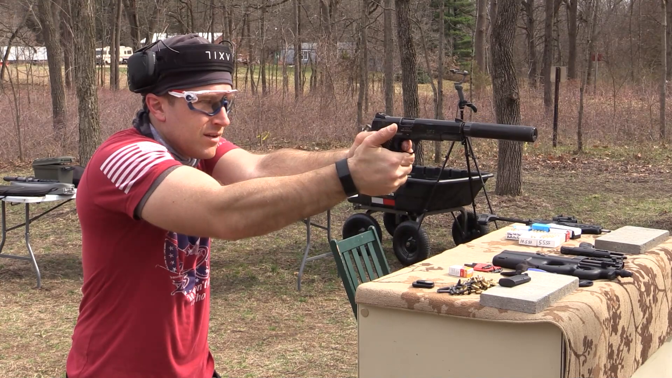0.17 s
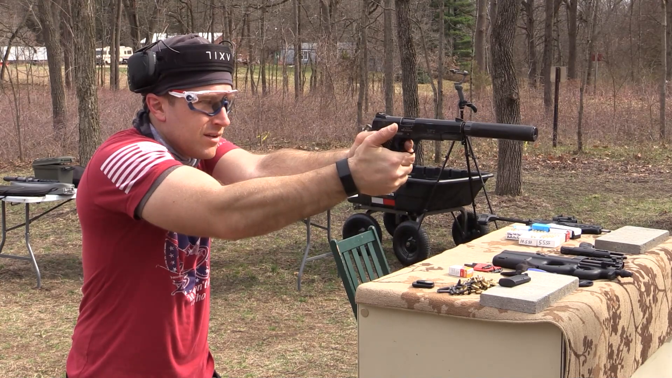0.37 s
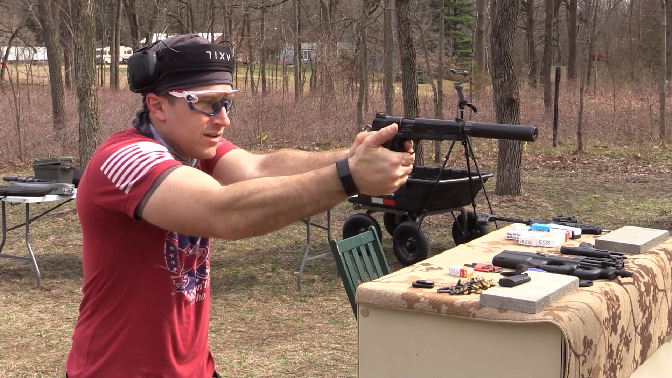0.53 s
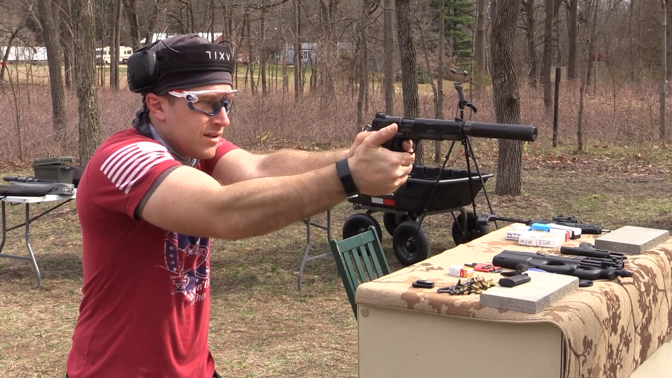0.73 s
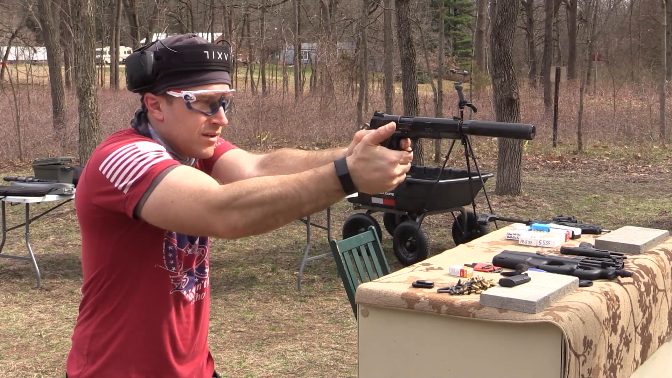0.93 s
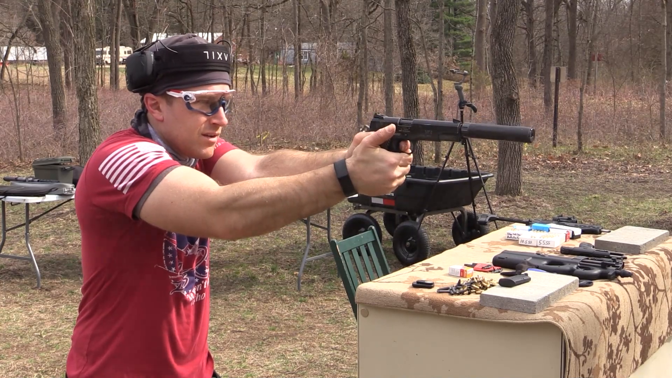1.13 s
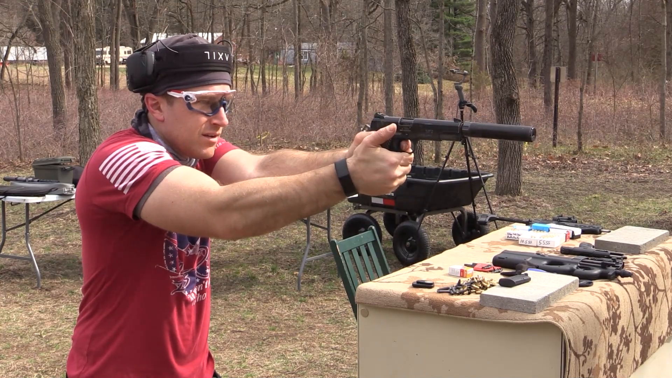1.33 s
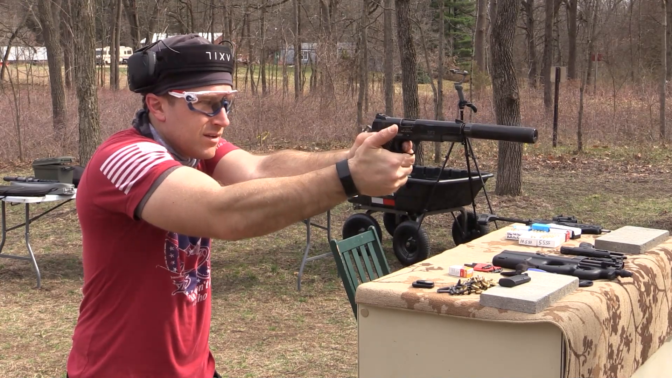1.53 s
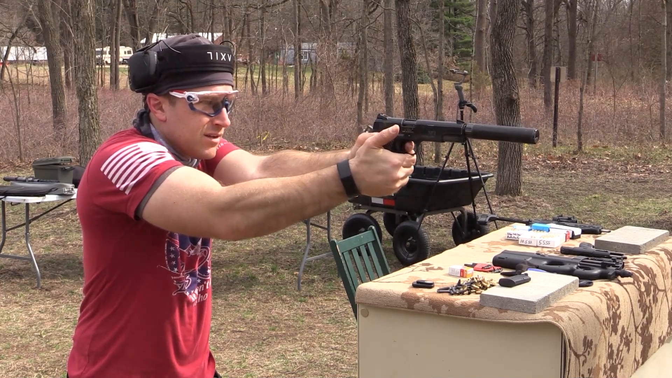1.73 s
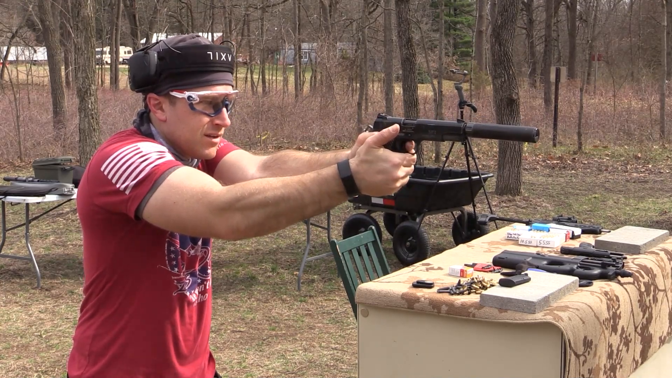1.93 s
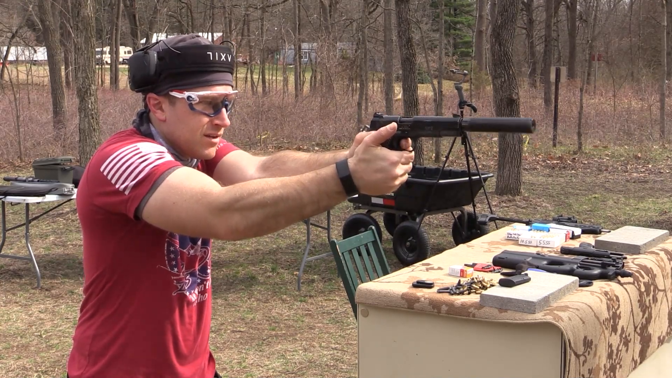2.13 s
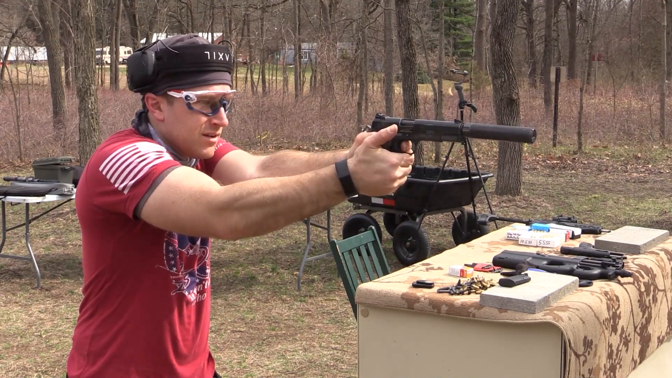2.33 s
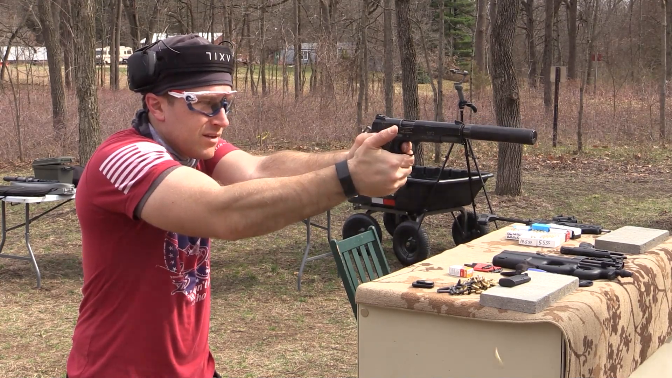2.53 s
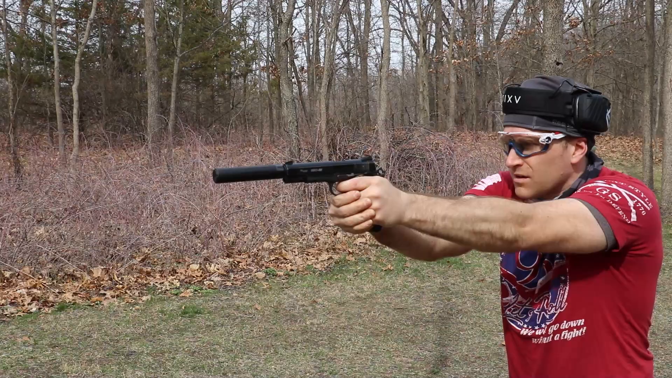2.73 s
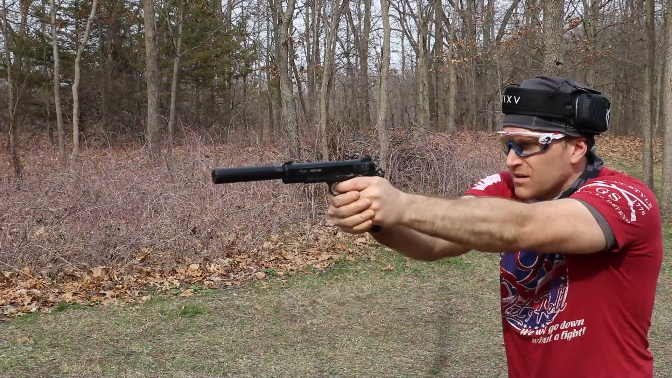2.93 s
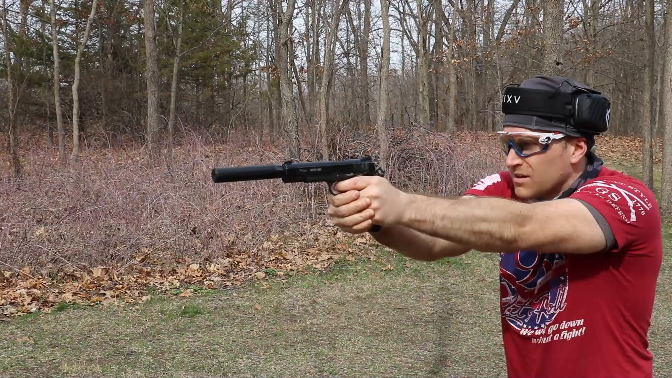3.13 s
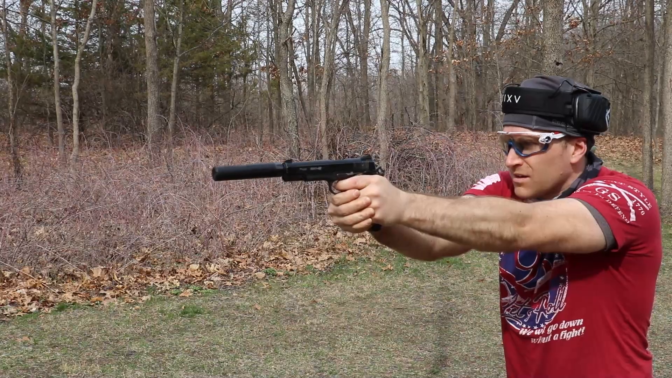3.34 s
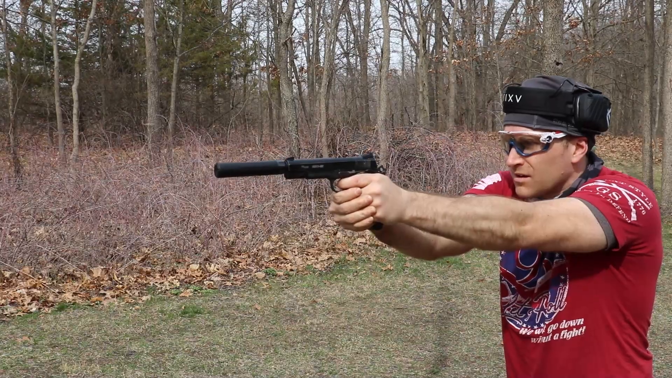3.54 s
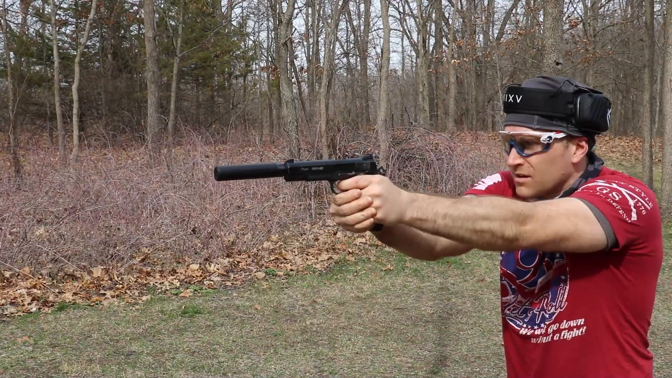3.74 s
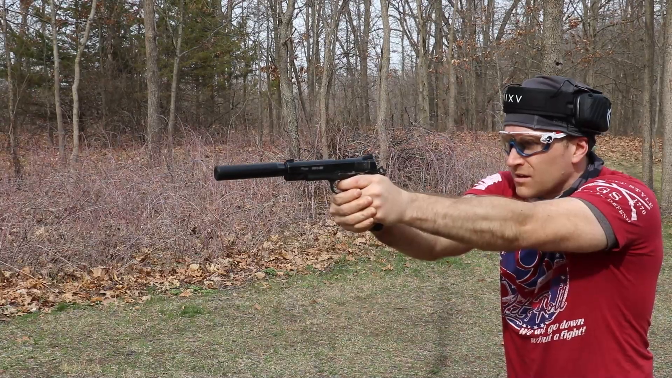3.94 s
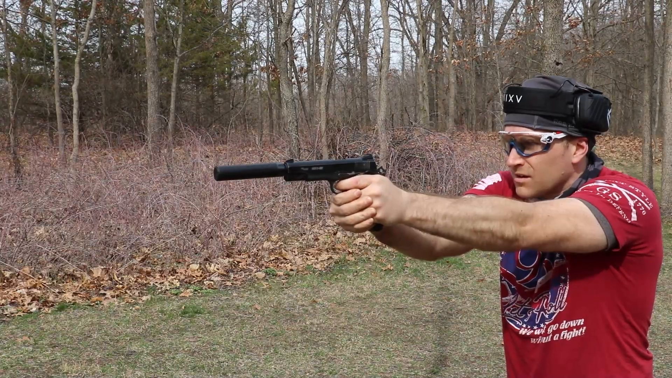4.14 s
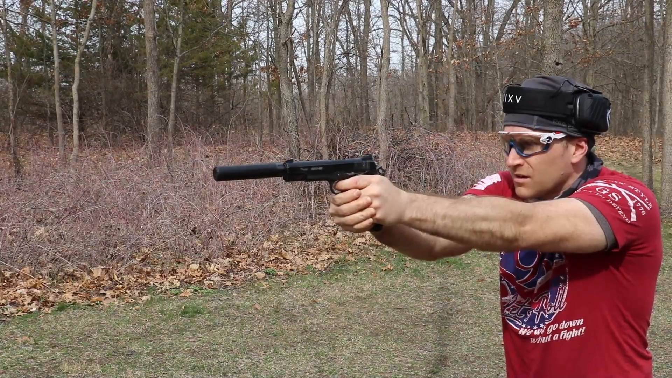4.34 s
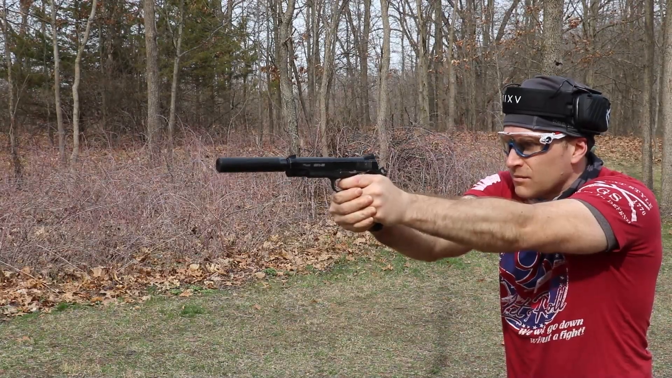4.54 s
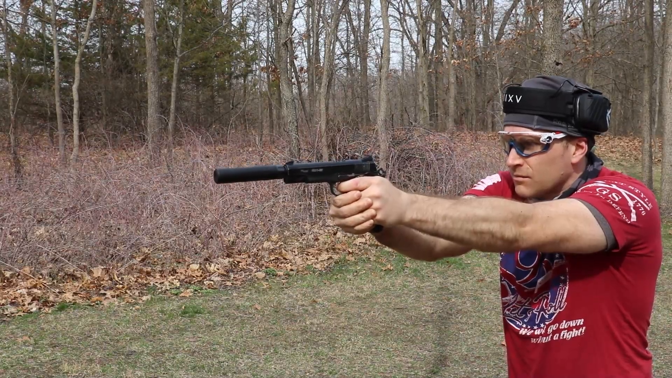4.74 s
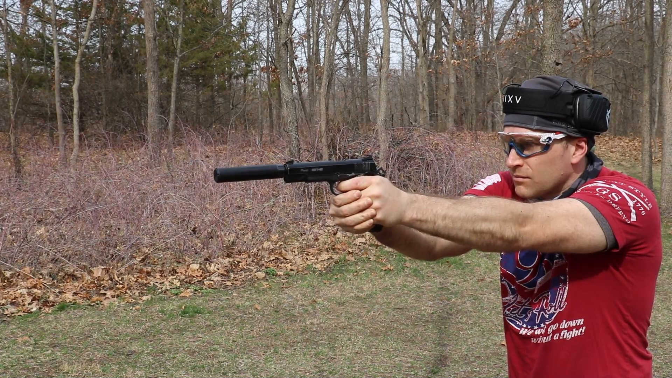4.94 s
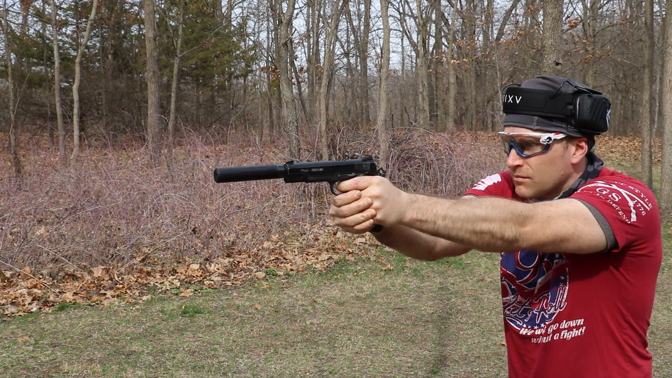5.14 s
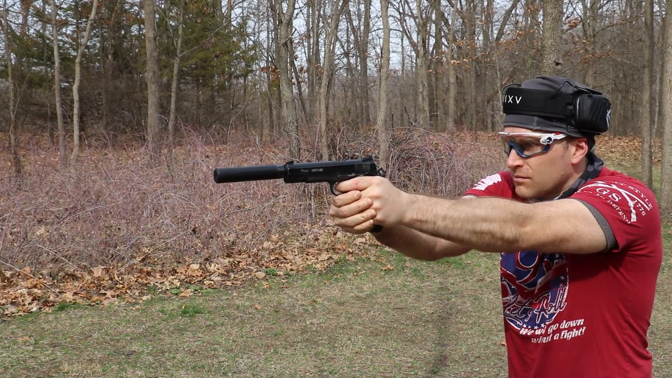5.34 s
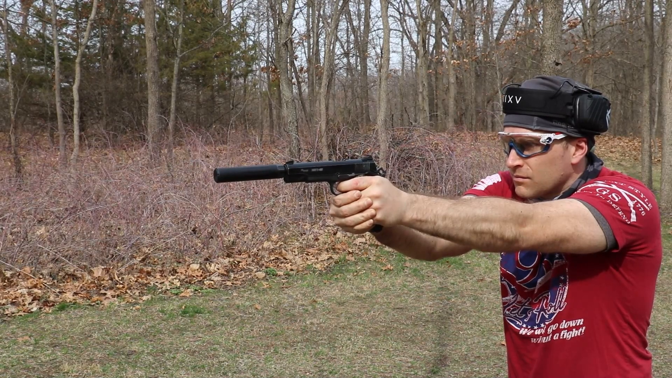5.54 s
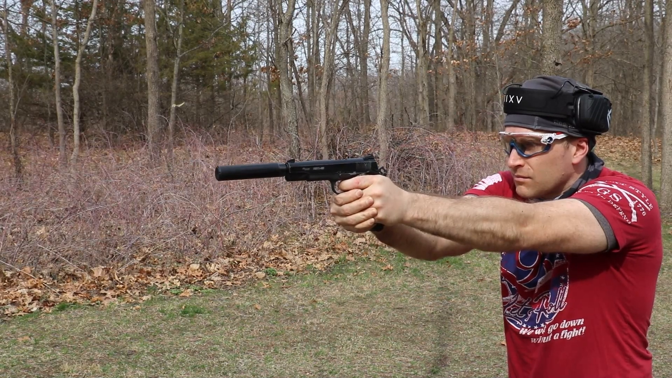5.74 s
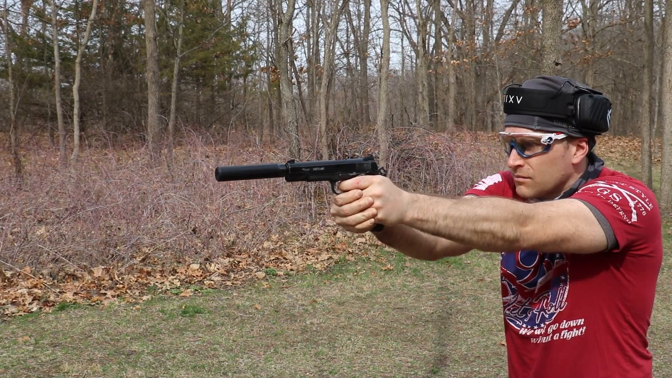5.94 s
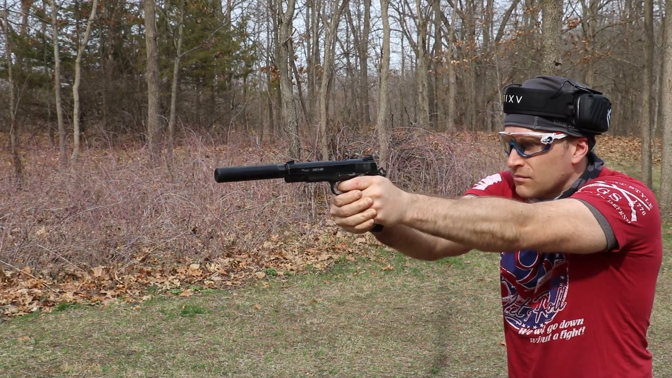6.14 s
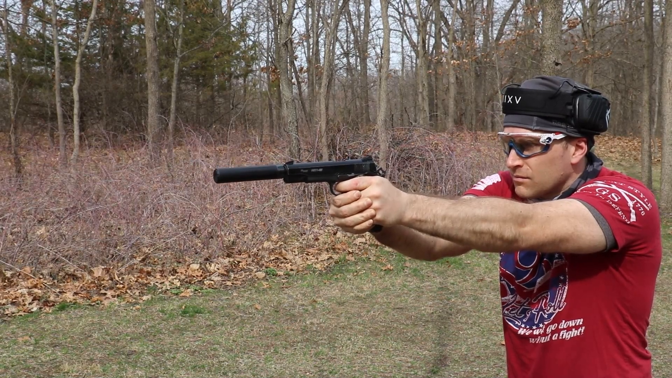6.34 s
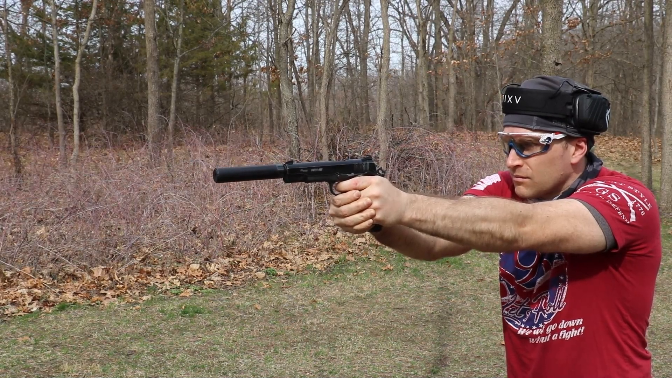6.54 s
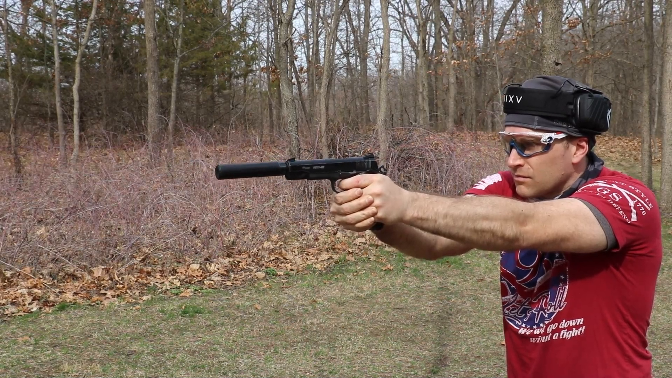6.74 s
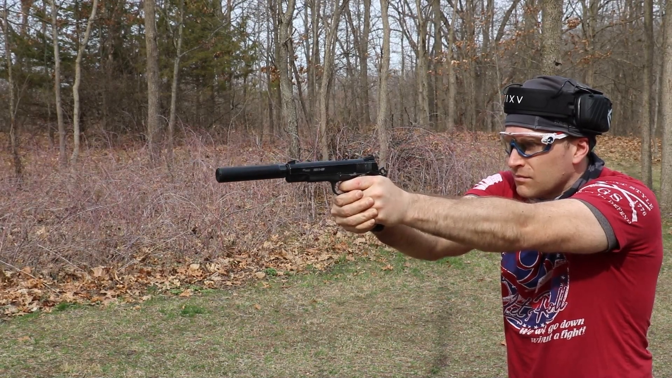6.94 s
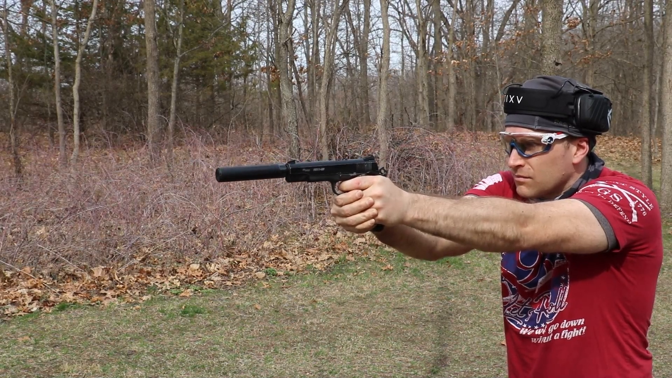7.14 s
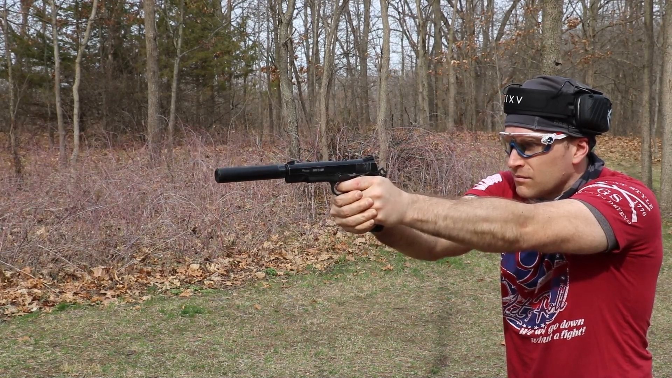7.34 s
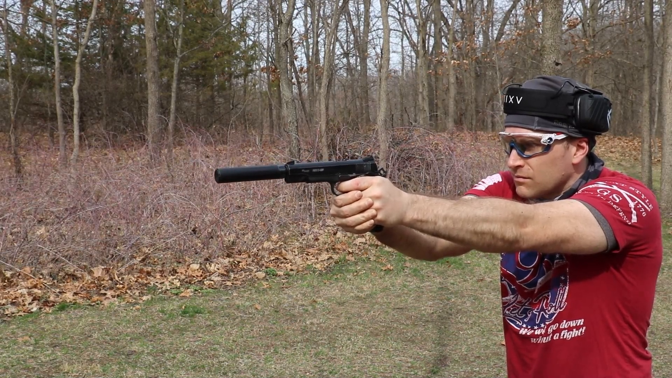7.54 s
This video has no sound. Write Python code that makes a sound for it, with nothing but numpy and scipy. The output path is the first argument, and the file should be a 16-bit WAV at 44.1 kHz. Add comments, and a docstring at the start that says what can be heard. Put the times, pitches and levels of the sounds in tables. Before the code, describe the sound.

Six suppressed pistol shots pop about a second apart outdoors, each with a metallic clack, a fading echo and a faint bullet thud.

```python
"""A lawn at the edge of a wood, in light wind: six shots from a suppressed small-calibre pistol.
Each is a puff and hiss of escaping gas with the clack of the steel slide. The ground reflects it,
the trees scatter it into a fading wash, and the bullet thuds home downrange.
The trigger clicks as it resets between shots, and a far bird whistles twice before the first."""
import sys
import numpy as np
from scipy import signal
from scipy.fft import rfft, irfft
from scipy.io import wavfile
from scipy.ndimage import uniform_filter1d

SR = 44100
rng = np.random.default_rng(int(sys.argv[2]) if len(sys.argv) > 2 else 0)


def int16_out(signal):
    """Quantize to a 16-bit WAV file."""
    q = np.round(np.clip(np.atleast_2d(signal).T, -1, 1) * 32767)
    wavfile.write(sys.argv[1], SR, q.astype(np.int16))


N = 334278


def amp(db):
    """Amplitude ratio: tenfold for every 20 dB."""
    return 10 ** (np.asarray(db) / 20)


def unit_rms(x):
    """Normalisation to a mean power of 1."""
    return x / np.sqrt(np.mean(x ** 2) + 1e-20)


def value_at(curve, hz):
    """Interpolation on a log-frequency axis."""
    knots_hz, values = np.transpose(curve)
    return np.interp(np.log(hz + 1), np.log(knots_hz + 1), values)


def add(mix, start_s, sound):
    """Superposition: a sound sums into the mix from start_s on."""
    part = mix[max(round(start_s * SR), 0):][:len(sound)]
    part += sound[:len(part)]


def coloured(x, spectrum):
    """Zero-phase filtering by rows of frequency_hz, gain_db."""
    return irfft(rfft(x) * amp(value_at(spectrum, np.fft.rfftfreq(len(x), 1 / SR))), len(x))


def noise(spectrum, size):
    """Spectrally shaped Gaussian noise of unit power."""
    return unit_rms(coloured(rng.standard_normal(size), spectrum))


def flicker(size):
    """Slow random modulation: a 9 ms moving average of noise."""
    return unit_rms(uniform_filter1d(rng.standard_normal(size), 400))


def transient_time():
    """The 0.2 s time axis of a transient."""
    return np.arange(SR // 5) / SR


def burst(spectrum, rise_s, hold_s, decay_s):
    """Noise with a linear attack, decaying exponentially from time hold_s."""
    t = transient_time()
    return noise(spectrum, len(t)) * np.minimum(t / rise_s, 1) * np.exp(-np.maximum(t - hold_s, 0) / decay_s)


def puff(hz, damping):
    """A heavily damped oscillation: pressure swings once or twice about zero."""
    cycles = hz * transient_time()
    return -np.sin(2 * np.pi * cycles) * np.exp(-damping * cycles)


def ring(modes):
    """Free vibration of struck metal: a sum of exponentially decaying modes."""
    t = transient_time()
    return sum(amp(level_db - 60 * t / t60_s) * np.sin(2 * np.pi * (hz * t + rng.random()))
               for hz, level_db, t60_s in modes)


def wind(waver_db, buffet_waver_db):
    """Turbulence: a steady rustle in the trees and uneven gusts on the microphone."""
    # spectra of the rustle and of the buffeting: frequency_hz, level_db
    rustle_spectrum = [(12, -28), (20, -1), (44, -7.5), (74, -1.5), (168, -4), (485, -13), (527, -14),
                       (759, -17.5), (1060, -20.5), (1150, -22), (1530, -25), (2600, -31.5), (16000, -52)]
    buffet_spectrum = [(10, -5.5), (35, -2), (60, -8), (120, -18.5), (400, -35.5), (3000, -72.5)]
    # gusts at full strength: start_s, length_s, level_db
    gusts = [(0, .7, -47.5), (2.397, .5, -61), (4.2, 0.41, -60)]
    t = np.arange(N) / SR
    coarse_t = t[::256]
    swell = sum(np.sin(2 * np.pi * (hz * coarse_t + rng.random())) / np.sqrt(hz)
                for hz in np.geomspace(1.5, 14, 20))
    swell = np.interp(t, coarse_t, unit_rms(swell))
    rustle = amp(-50.5 + waver_db * swell) * noise(rustle_spectrum, N)
    microphone_hiss = amp(-78.5) * rng.standard_normal(N)
    ramp_s, calm_db = .2, -64.5
    gusting = sum(amp(level_db) * np.clip(1 + np.minimum(t - start_s, start_s + length_s - t) / ramp_s, 0, 1)
                  for start_s, length_s, level_db in gusts)
    strength = np.hypot(amp(calm_db), gusting) * amp(buffet_waver_db * swell)
    return rustle + microphone_hiss + strength * noise(buffet_spectrum, N)


def bird(top_hz, bottom_hz, fall_s, ramp_s):
    """Frequency glide: far whistles fall exponentially, growing louder as they level off."""
    # the bird's calls: start_s, length_s, level_db
    whistles = [(0.174, 0.2, -65), (0.617, .19, -68.5)]
    out = np.zeros(N)
    for start_s, length_s, level_db in whistles:
        t = np.arange(0, length_s, 1 / SR)
        pitch_hz = bottom_hz + (top_hz - bottom_hz) * np.exp(-t / fall_s)
        flutter = 1 + 0.46 * flicker(len(t))
        swell = np.minimum(t / ramp_s, 1) * np.minimum((length_s - t) / ramp_s, 1) * bottom_hz / pitch_hz
        tone = np.sin(2 * np.pi * np.cumsum(pitch_hz) / SR)
        add(out, start_s, amp(level_db) * swell * flutter * tone)
    return out


def with_ground_bounce(direct, delay_s=.00635):
    """Reflection: the lawn adds a later, duller copy to the direct sound."""
    # what the grass throws back: frequency_hz, gain_db
    reflectance = [(40, -3), (800, -5.5), (2000, -14.5), (6000, -20), (16000, -14.5)]
    out = direct.copy()
    add(out, delay_s, coloured(direct, reflectance))
    return out


def wood_echo(bore, whistle_db):
    """Multiple scattering: trunks and twigs spread a shot into a wash whose treble dies first."""
    # spectrum of the scattered sound: frequency_hz, level_db
    wash_spectrum = [(60, -16), (300, -5), (1000, -4), (2400, -2.5), (3700, -4.5), (5800, -0.5),
                     (8000, -0.5), (10000, 0), (13000, -4.5), (16000, -15)]
    # reverberation time of the wood: frequency_hz, t60_s
    decay_times = [(100, .6), (1000, 1.8), (3000, 1.23), (6000, 0.72), (10000, 0.57), (16000, 0.21)]
    near_t60_s, sheen_t60_s, build_s = 0.17, 0.79, 0.0066
    t = np.arange(SR * 3 // 2) / SR
    hz, frame_s, bands = signal.stft(noise(wash_spectrum, len(t)), SR, nperseg=256)
    far = amp(-39.5 - 60 * frame_s / value_at(decay_times, hz)[:, None])
    near = amp(-25 - 60 * frame_s / near_t60_s)
    wash = signal.istft(bands * (far + near), SR, nperseg=256)[1][:len(t)]
    sheen = amp(whistle_db - 39.5 - 60 * t / sheen_t60_s) * noise(bore, len(t))  # the whistle returns
    lumps = amp(1.4 * flicker(len(t)))  # thick trunks stand out a little
    return (wash + sheen) * lumps * np.minimum(t / build_s, 1)


def trigger():
    """Impact excitation: a tiny click rings the trigger bar, duller when it is softer."""
    # clicks of the trigger, mostly its reset: start_s, level_db
    clicks = [(0.309, -58), (0.3548, -36.5), (1.7098, -47.5), (2.9910, -38.5), (4.1659, -38), (5.326, -38),
              (6.3095, -38), (7.3730, -38.5), (6.3930, -58)]
    # modes of the trigger bar: frequency_hz, level_db, t60_s
    bar_modes = [(2290, -9.5, 0.012), (4170, -4, 0.0087), (6630, -1.5, 0.0088), (7100, -3.5, 0.0062),
                 (8800, -0.5, 0.0041), (11130, 3.5, 0.0054), (11700, -19, 0.011), (12150, 6.5, 0.0034),
                 (14700, -3, .004)]
    # spectrum of the contact: frequency_hz, level_db
    tick_spectrum = [(300, -28), (1500, 5), (2500, -1), (5400, -0.5), (7000, -2), (12000, -3), (16000, -4)]
    firm_click_db = -33
    out = np.zeros(N)
    for start_s, click_db in clicks:
        tilt_db_per_octave = 1 + 0.62 * (click_db - firm_click_db)
        modes = [(hz, db + tilt_db_per_octave * np.log2(hz / 6000), t60_s) for hz, db, t60_s in bar_modes]
        tick = burst(tick_spectrum, rise_s=.0001, hold_s=0.000081, decay_s=0.00061)
        click = amp(click_db) * (tick + amp(-1) * ring(modes))
        add(out, start_s, with_ground_bounce(click))
    return out


def bullets():
    """Inelastic impact: each bullet snaps through the target with a thud and lands just behind it."""
    # strikes about 0.15 s after each shot: start_s, thud_db, crunch_db, snap_db
    impacts = [(1.0032, -24, -40, -31), (2.335, -34.5, -31, -38), (3.59, -26, -58, -36.5),
               (4.7120, -28.5, -37, -30.5), (5.7740, -37, -58, -37), (6.802, -31, -40, -42)]
    # spectra of the dull crunch and the bright snap: frequency_hz, level_db
    crunch_spectrum = [(200, 7), (900, -9), (2400, 3), (4000, -10), (10000, -13), (16000, -35)]
    snap_spectrum = [(500, -4), (4000, -22), (7500, 3), (10000, -13), (13000, -10), (16000, -28)]
    out = np.zeros(N)
    for start_s, thud_db, crunch_db, snap_db in impacts:
        strike = amp(crunch_db) * burst(crunch_spectrum, rise_s=0.0001, hold_s=0.0011, decay_s=0.0022)
        strike += amp(snap_db) * burst(snap_spectrum, rise_s=0.0003, hold_s=0.001, decay_s=0.0007)
        add(out, start_s, strike)
        add(out, start_s + 0.00094, amp(thud_db) * puff(hz=193, damping=1.87))
        add(out, start_s + .0099, amp(-6.5) * strike)  # the landing
    return out


def clack(hold_s, decay_s, ring_db):
    """Collision of steel on steel: a short crash leaves the frame's modes ringing."""
    # spectrum of the crash: frequency_hz, level_db
    crash_spectrum = [(100, -29.5), (550, -28.5), (950, -7), (1400, -3), (2300, 1.5), (3600, -4),
                      (5000, -2), (8500, 2), (13000, -2.5), (16000, -16)]
    # modes of the slide and frame: frequency_hz, level_db, t60_s
    steel_modes = [(1310, -9, 0.028), (2380, 1.5, 0.028), (2956, -5.5, 0.059), (4040, -8, .03),
                   (5950, -1.5, 0.039), (7400, -4.5, 0.064), (8330, 1, 0.04), (8340, -4, 0.03),
                   (9400, -9.5, 0.051), (10400, -8.5, .03), (11200, -4, .03)]
    crash = burst(crash_spectrum, rise_s=0.000073, hold_s=hold_s, decay_s=decay_s)
    return crash + amp(ring_db) * ring(steel_modes)


def bore_resonance(centre_hz, width_octaves):
    """Resonance of the suppressor's bore: a band 10 dB down at width_octaves from its centre."""
    shape = [(-4, -38), (-1, -10), (0, 0), (1, -10), (4, -38)]
    return [(centre_hz * 2 ** (widths * width_octaves), db) for widths, db in shape]


def muzzle_gas(bore, whistle_db):
    """Throttled flow: the baffles let the gas out slowly, with a hiss and a breathy whistle."""
    # spectrum of the escaping gas: frequency_hz, level_db
    gas_spectrum = [(60, -36), (300, -26.5), (700, -4.5), (1400, 0), (2200, -1), (3400, -5), (5500, -0.5),
                    (8000, -0.5), (13000, 0.5), (14500, -8.5), (16500, -15.5)]
    hiss = burst(gas_spectrum, rise_s=0.0019, hold_s=0.0057, decay_s=.0012)
    tail = amp(-22) * burst(gas_spectrum, rise_s=0.0038, hold_s=0.0049, decay_s=0.014)
    whistle = amp(whistle_db) * burst(bore, rise_s=0.012, hold_s=0.0062, decay_s=0.0033)
    return hiss + tail + whistle


def shot(gas_db, shut_s, bore, whistle_db):
    """Gas pressure puffs from muzzle and breech and drives the slide back; a spring returns it."""
    # spectrum of the frame taking the slide's knock: frequency_hz, level_db
    knock_spectrum = [(300, -36.5), (700, -18), (1200, 7), (2600, -1), (4000, -16.5), (16000, -30.5)]
    out = np.zeros_like(transient_time())
    add(out, 0, amp(-16) * clack(hold_s=0.00035, decay_s=.001, ring_db=-21))  # the hammer falls
    add(out, .0008, amp(gas_db - 2) * muzzle_gas(bore, whistle_db))
    add(out, .0007, amp(gas_db - 10) * puff(hz=135, damping=2.6))
    add(out, .0009, amp(gas_db - 10) * puff(hz=440, damping=1.9))
    add(out, .0039, amp(gas_db - 9) * puff(hz=830, damping=3.5))  # the breech opens
    add(out, .0108, amp(-10) * clack(hold_s=0.0012, decay_s=.0008, ring_db=-25.5))  # case kicked out
    add(out, .0139, amp(-10) * clack(hold_s=0.0018, decay_s=0.0018, ring_db=-19.5))  # slide at its stop
    add(out, .0285, amp(-27.5) * clack(hold_s=0.0014, decay_s=.002, ring_db=-16))  # next round picked up
    # the spring shuts the slide equally hard every time, and the slide then settles
    add(out, shut_s, amp(-9) * clack(hold_s=0.0019, decay_s=0.001, ring_db=-15.5))
    add(out, shut_s, amp(-16.5) * burst(knock_spectrum, rise_s=0.00076, hold_s=0.00076, decay_s=.0005))
    add(out, shut_s + 0.0051, amp(-19.5) * clack(hold_s=0.0012, decay_s=.0012, ring_db=-20))
    # a small muzzle radiates little deep bass
    return signal.sosfilt(signal.butter(1, 80, "highpass", fs=SR, output="sos"), out)


def pistol():
    """Direct and reflected sound of every shot; the wood's echo scales with the gas."""
    # the shots: start_s, gas_db, shut_after_s, whistle_hz, whistle_db, width_octaves
    shots = [(0.8551, 1.5, 0.042, 5430, -8.5, 0.11), (2.1883, 1.5, 0.039, 5430, -6, 0.12),
             (3.4412, 0, 0.038, 7380, -13, .25), (4.5624, 2.5, .039, 6540, -6, 0.29),
             (5.6255, 0, .039, 5790, -6, 0.13), (6.6521, 0, 0.038, 5760, -8, 0.21)]
    out = np.zeros(N)
    for start_s, gas_db, shut_after_s, whistle_hz, whistle_db, width_octaves in shots:
        bore = bore_resonance(whistle_hz, width_octaves)
        add(out, start_s, with_ground_bounce(shot(gas_db, shut_after_s, bore, whistle_db)))
        add(out, start_s, amp(gas_db - 2) * wood_echo(bore, whistle_db))
    return out


def scene():
    """Superposition of the shooting, the bird and the wind in one channel."""
    shooting = pistol() + bullets() + trigger()
    birdsong = bird(top_hz=5300, bottom_hz=2300, fall_s=.072, ramp_s=.02)
    return (shooting + birdsong + wind(waver_db=0.12, buffet_waver_db=1.5))[None]


def record(dry):
    """Saturation: overload flattens the crest of each shot, then a low-pass limits the band."""
    ceiling, cutoff_hz = .6, 16100
    oversampled = signal.resample_poly(dry, 2, 1, axis=1)
    saturated = oversampled / (1 + (oversampled / ceiling) ** 4) ** (1 / 4)
    flattened = signal.resample_poly(saturated, 1, 2, axis=1)
    lowpass = signal.firwin(255, cutoff_hz, window=("kaiser", 9), fs=SR)
    return signal.oaconvolve(flattened, lowpass[None], "same")


dry = scene()
out = record(dry)
int16_out(out)
```